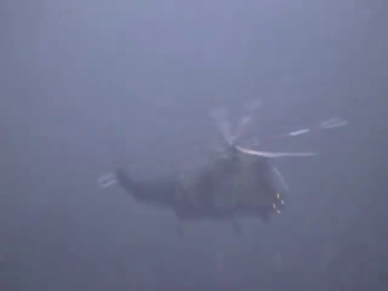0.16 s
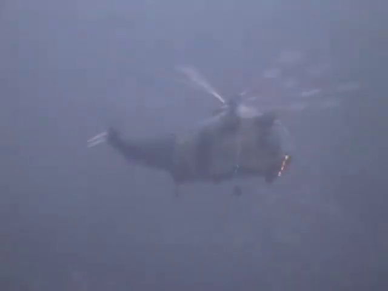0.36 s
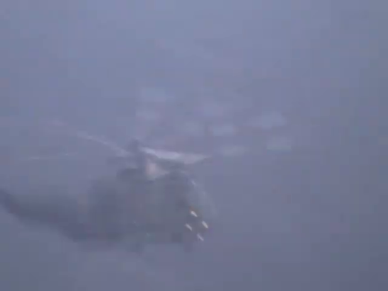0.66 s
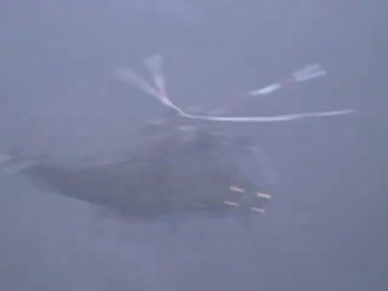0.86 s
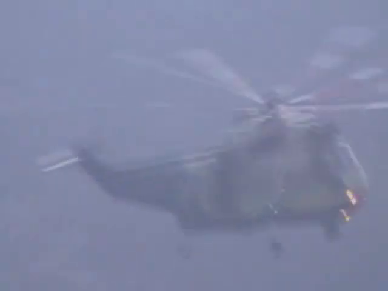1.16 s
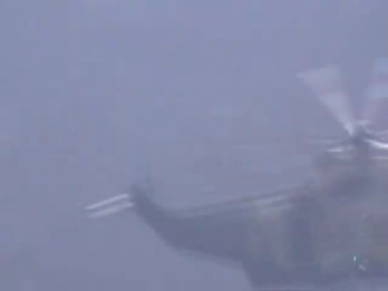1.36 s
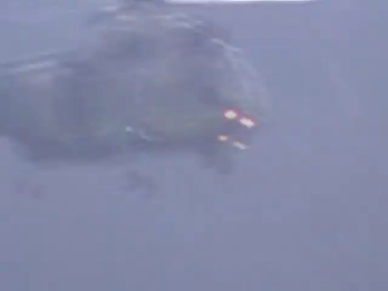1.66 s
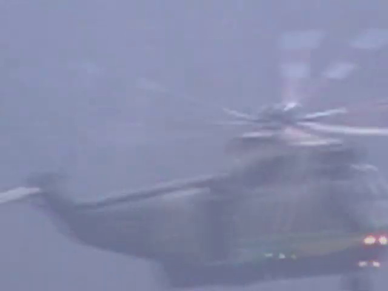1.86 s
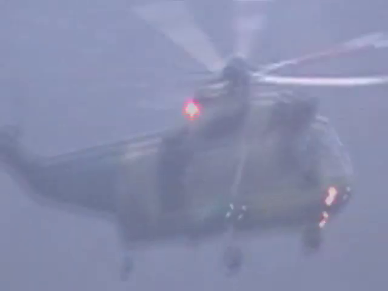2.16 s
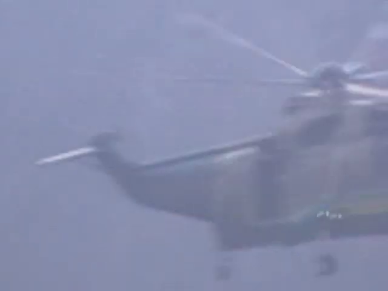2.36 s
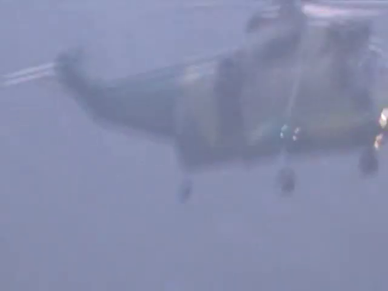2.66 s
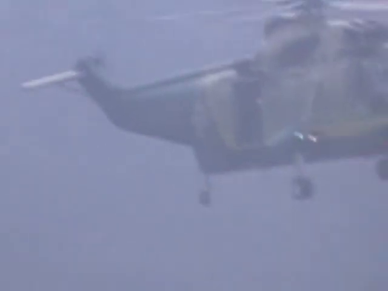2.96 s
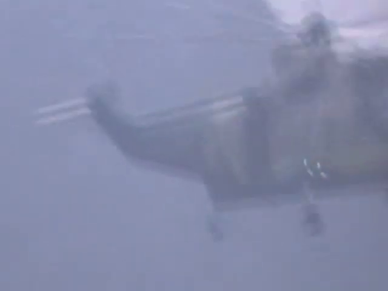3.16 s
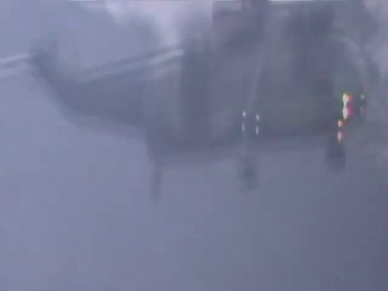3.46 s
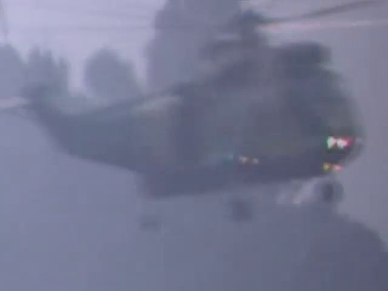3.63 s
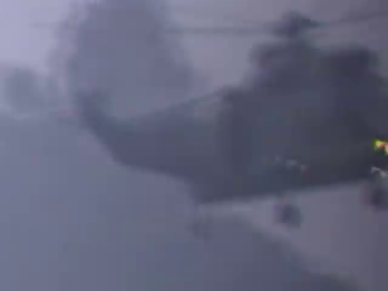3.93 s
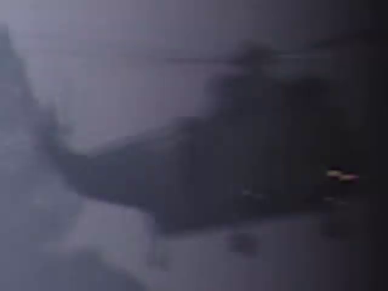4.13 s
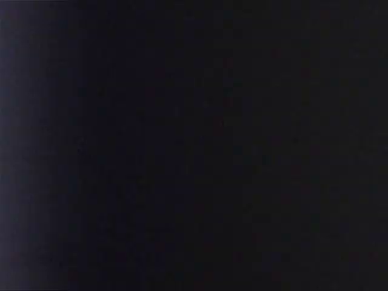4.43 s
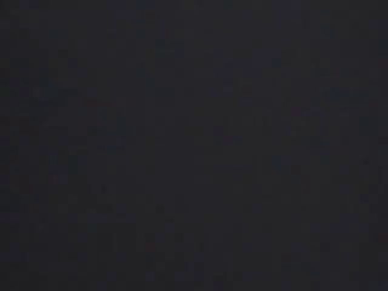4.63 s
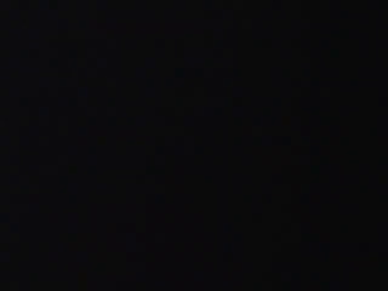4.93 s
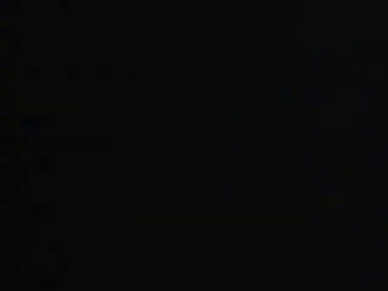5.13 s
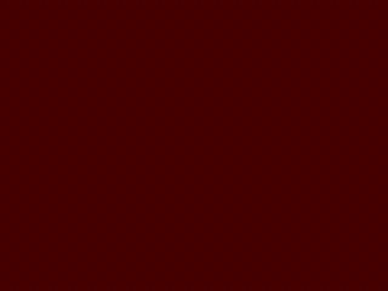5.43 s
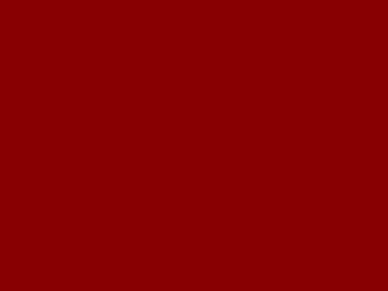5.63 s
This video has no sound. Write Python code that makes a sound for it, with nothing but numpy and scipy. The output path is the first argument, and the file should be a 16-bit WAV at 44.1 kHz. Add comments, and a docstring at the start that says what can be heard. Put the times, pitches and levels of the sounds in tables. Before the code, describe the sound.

Rapid, uneven helicopter chopping and low thumping with a breathy turbine hiss and thin whine, one dry microphone click, then a smooth fade-out.

```python
"""Rotor beats thump against each other as a helicopter passes slowly outdoors, over turbine hiss and roar.
Three sums of harmonics make the beats; the chopping one also swells the treble of the shaped-noise hiss.
Blade slaps are short decaying rings, the roar is noise in swelling bands, whine and buzz follow the thump.
Short noise bursts click once at the microphone housing, and the sound fades to silence."""
import sys
import numpy as np
from scipy import signal
from scipy.fft import rfft, irfft
from scipy.io import wavfile
from scipy.ndimage import uniform_filter1d

SR = 44100
rng = np.random.default_rng(int(sys.argv[2]) if len(sys.argv) > 2 else 0)


def unload_audio(sound):
    """Save the sound as a 16-bit wav file, at the path given as the first command line argument."""
    columns = np.transpose(np.atleast_2d(sound))
    # keep every value between -1 and 1, then stretch to whole-number steps
    steps = np.round(np.clip(columns, -1, 1) * 32767)
    wavfile.write(sys.argv[1], SR, steps.astype(np.int16))


N = 255339
T = np.arange(N) / SR  # time, s

# Beat rates, the thump sinking as the machine draws past: time_s, thump_hz, throb_hz
BEAT_RATES = [(0, 38.717, 22.126), (.6, 38.683, 22.568), (1.2, 38.575, 22.374), (1.8, 38.394, 22.033),
              (5.4, 37.727, 22.027)]
CHOP_PER_THUMP = .95585  # the chop is geared to the thump
FADE_FROM_S, FADE_TO_S = 3.486, 5.332


def gain_of(db):
    """dB to gain."""
    return 10 ** (np.asarray(db) / 20)


def evened(x):
    """Scales to rms 1."""
    return x / np.sqrt(np.mean(x ** 2) + 1e-20)


def read(points, hz, count=1):
    """One column of a spectrum table, on a log-frequency axis."""
    columns = np.transpose(points)
    return np.interp(np.log(hz + 1), np.log(columns[0] + 1), columns[count])


def curve(rows, count):
    """One column of a time table at every sample."""
    columns = np.transpose(rows)
    return np.interp(T, columns[0], columns[count])


def drift(per_s):
    """Slow random wander of rms 1, with so many new values per second."""
    steps = rng.standard_normal(600)
    return evened(np.interp(T * per_s, np.arange(600), steps))


def turns(count):
    """Cycles since the first pulse of one beat: 0 thump, 1 throb, 2 chop."""
    # Time of the first pulse of thump, throb and chop: start_s
    first_pulse_s = (.01911, .01085, -.00014)
    thump_hz = curve(BEAT_RATES, 1)
    hz = (thump_hz, curve(BEAT_RATES, 2), CHOP_PER_THUMP * thump_hz)[count]
    return np.cumsum(hz) / SR - hz[0] * first_pulse_s[count]


def beat(orders, count, gain_db, waver_db):
    """One pressure pulse a cycle: its multiples start together and ring on, the higher ones shifted in phase."""
    # Growing lag of each multiple behind the one below, for thump, throb and chop: lag_cycles
    sweep = (.009, -.002, .042)
    k, db = np.transpose(orders)
    filled_db = np.interp(np.arange(33), np.r_[0, k, 32], np.r_[db[0], db, -80])
    log_gain = np.log(gain_of(filled_db))
    # The least-delay phase that belongs to these levels
    phase = -np.imag(signal.hilbert(np.r_[log_gain, log_gain[-2:0:-1]]))
    start = phase[k.astype(int)] - np.pi * sweep[count] * k ** 2
    cycles = turns(count)
    pulse = np.zeros(N)
    for multiple, level_db, offset in zip(k, db, start):
        level = np.sqrt(2) * gain_of(level_db + gain_db + waver_db * drift(8))
        pulse += level * np.cos(2 * np.pi * multiple * cycles + offset)
    return pulse


def rotor_beats():
    """Three rotor pulse trains at different rates drift in and out of step."""
    # Strength of each multiple of a beat, before its gain trim: multiple, level_db (rms)
    thump = [(1, -47.0), (2, -63.0), (3, -39.0), (4, -45.0), (5, -53.0), (6, -47.0), (7, -41.0), (8, -36.0),
             (9, -33.0), (10, -36.0), (11, -38.0), (12, -39.0), (13, -39.0), (14, -55.0), (15, -64.0),
             (16, -61.0), (17, -59.0), (18, -81.0)]
    throb = [(1, -70.0), (2, -53.0), (3, -42.0), (4, -38.0), (5, -43.0), (6, -40.0), (7, -39.0), (8, -57.0),
             (9, -49.0), (10, -48.0), (11, -45.0), (12, -50.0)]
    chop = [(1, -62.0), (2, -68.0), (3, -53.0), (4, -44.0), (5, -47.0), (6, -44.0), (7, -52.0), (8, -48.0),
            (9, -40.0), (10, -43.0), (11, -44.0), (12, -47.0), (13, -48.0), (14, -50.0), (15, -67.0)]
    beats = beat(thump, count=0, gain_db=0.0, waver_db=0.88)
    beats += beat(throb, count=1, gain_db=0.96, waver_db=2.0)
    return beats + beat(chop, count=2, gain_db=-0.05, waver_db=1.15)


def slaps(rise_s, t60, count, gain_db):
    """A blade cuts a vortex: a sharp crack, wider for the loud ones, then a short ring; faint ones at random."""
    # The loud slaps: start_s, level_db (before rise and trim), ring_hz
    loud = [(0.5851, -25, 1180), (0.6165, -24, 1120), (0.6699, -17, 1270), (0.7287, -21, 1180),
            (0.7831, -25, 1170), (0.8395, -20, 1310), (0.8944, -21, 1210), (0.9482, -22, 1200),
            (1.0191, -21, 1170), (1.1368, -22, 1240), (1.281, -23, 1180), (1.3394, -21, 1150),
            (1.3887, -23, 1160), (1.4486, -19, 1240), (1.5628, -25, 1200), (1.8901, -23, 1210),
            (2.2294, -28, 1110), (2.3296, -27, 1310), (2.4987, -26, 1140), (3.1428, -27, 1190),
            (3.235, -24, 1140), (3.5912, -28, 1320), (3.6471, -27, 1290), (3.696, -23, 1280),
            (3.7454, -25, 1260), (3.8067, -24, 1180), (3.9684, -26, 1150), (4.0243, -28, 1200),
            (4.4603, -36, 1180), (1.8821, -29, 1730), (2.0043, -29, 1610), (2.0602, -28, 1700),
            (2.164, -32, 1560)]
    faint_hz, faint_db = 1260, -29.5
    out, t = np.zeros(N), np.arange(2000) / SR
    rows = list(loud) + [(s, faint_db, faint_hz) for s in rng.uniform(0, FADE_TO_S, count)]
    for (s, db, hz), (p, q) in zip(rows, rng.random((len(rows), 2))):
        # One partner above the ring and one below widen the first instant
        partners = np.sin(2 * np.pi * (1.3 + .15 * p) * hz * t)
        partners += np.sin(2 * np.pi * (.55 + .2 * q) * hz * t)
        ring = np.sin(2 * np.pi * hz * t) + gain_of(db + 17 - 2500 * t) * partners
        envelope = gain_of(db + gain_db - 60 * t / t60) * (1 - np.exp(-t / rise_s))
        out[round(s * SR):][:2000] -= envelope * ring
    return out


def puffs(cycles, at, width):
    """A bell-shaped opening once a cycle; place and width in cycles."""
    return np.exp(-.5 * (((cycles - at + .5) % 1 - .5) / width) ** 2)


def chop_strength(cycles, spread_db):
    """Each pass of the chopping beat has its own strength; some drop out."""
    # Passes at which the chop falls weak: time_s, drop_db
    dropouts = [(0.45, -25), (0.774, -25), (0.883, -25), (0.937, -25), (0.991, -9), (1.045, -25),
                (1.127, -8), (1.235, -25), (1.289, -7), (1.425, -25), (1.588, -25), (1.615, -7),
                (1.643, -10), (1.697, -25), (1.752, -6), (1.806, -25), (1.997, -25), (2.051, -25),
                (2.27, -7), (2.434, -25), (2.625, -25), (2.762, -25), (2.817, -25), (2.899, -25),
                (2.981, -25), (3.283, -9), (3.31, -25), (3.365, -8), (3.42, -8), (3.503, -10), (3.53, -9),
                (3.557, -25), (3.722, -25), (3.805, -9), (3.915, -25), (4.025, -7), (4.135, -25),
                (4.218, -9), (4.301, -25), (4.356, -25), (4.384, -25), (4.466, -25), (4.632, -9),
                (4.66, -25), (4.964, -25)]
    db = spread_db * (1 + rng.random(300)) / 2
    s, drop_db = np.transpose(dropouts)
    db[np.floor(np.interp(s, T, cycles)).astype(int) + 1] += drop_db
    return gain_of(db)[np.floor(cycles).astype(int) + 1]


def air(db_per_hz, patchy_db, chop=None):
    """Noise as random short-time spectra with drifting patches; two unrelated draws."""
    # Swell of the treble for a chop value of 1: frequency_hz, swell_db
    chopped = [(1500, 0), (3500, 2.5), (6500, 4), (9000, 4), (12000, 5)]
    frames, hz = N // 64 + 8, np.fft.rfftfreq(256, 1 / SR)
    a, b, c, d, patches = rng.standard_normal((frames, 129, 5)).T
    # Smoothed over 3 frequency bins and 30 frames
    patches = uniform_filter1d(uniform_filter1d(patches, 3, 0), 30, 1)
    field_db = patchy_db * evened(patches)
    if chop is not None:
        chop_at_frames = np.interp(np.arange(frames) * 64, np.arange(N), chop)
        field_db = field_db + read(chopped, hz)[:, None] * chop_at_frames
    plain = np.array([a + 1j * b, c + 1j * d])
    white = signal.istft(plain * gain_of(field_db), nperseg=256, noverlap=192)[1][:, :N]
    white = white / np.std(signal.istft(plain, nperseg=256, noverlap=192)[1])
    colour = gain_of(db_per_hz(np.fft.rfftfreq(N, 1 / SR))) * np.sqrt(SR / 2)
    return irfft(rfft(white) * colour, N)


def band(hz, width, x):
    """A bell-shaped band of x."""
    f = np.fft.rfftfreq(x.shape[-1], 1 / SR)
    return irfft(rfft(x) * np.exp(-.5 * ((f - hz) / width * 2) ** 2), x.shape[-1])


def repeating(gains, cycles, change_per_s):
    """A wave that returns every cycle, from the gains of its multiples; its shape slowly changes."""
    angle = rng.uniform(0, 2 * np.pi, (2, len(gains)))
    a, b = irfft(gains * np.exp(1j * angle), 8192) * 8192 / np.sqrt(2)
    place = cycles % 1 * 8192
    blend = change_per_s * T  # radians
    first = np.cos(blend) * np.interp(place, np.arange(8192), a)
    return first + np.sin(blend) * np.interp(place, np.arange(8192), b)


def compressor_tones(cycles):
    """Wavering high tones of the compressor, let through at each chop."""
    # Tones: multiple_of_chop, place_cycles, width_cycles, level_db (peak, before the strength of the pass)
    chirp = [(270, .635, .04, -50.5), (258, .77, .025, -54), (247, .72, .06, -56)]
    high = np.zeros(N)
    for k, at, width, db in chirp:
        level = gain_of(db + 1.2 * drift(29)) * puffs(cycles, at, width)
        high += level * np.sin(2 * np.pi * (k * cycles + .12 * drift(30)))
    return high


def hiss_bands():
    """Narrow bands of noise in the hiss, each with a wavering level."""
    # Bands: centre_hz, width_hz, level_db (rms, before wavering)
    tones = [(3066, 40, -60), (3425, 60, -63), (3568, 30, -64), (3714, 60, -62), (3895, 60, -63),
             (4136, 35, -63), (4300, 20, -68), (4898, 55, -62.5), (5760, 173, -63), (6340, 80, -66),
             (6780, 100, -66)]
    return sum(gain_of(db + 2 * drift(4)) * evened(band(hz, width, rng.standard_normal((2, N))))
               for hz, width, db in tones)


def turbines(cycles):
    """Wide hiss that swells at each chop, partly alike from pass to pass, with high tones and narrow bands."""
    # Colour of the turbine hiss: frequency_hz, relative_level_db (per Hz)
    hiss_colour = [(400, -22), (560, 1.5), (750, -10), (880, -3.5), (1000, -0.5), (1290, 1), (1450, -4),
                   (1700, -2.5), (2300, -8.5), (3000, -14), (4500, -18), (6800, -18.5), (8200, -22.5),
                   (10150, -23.5), (10400, -27.5), (11500, -39), (14600, -46)]
    hiss_db = -39  # rms
    repeat_db, repeat_from_hz = -59, 3500  # the part alike from pass to pass, before swell and strength
    strength = chop_strength(cycles - .2, spread_db=6)
    swell = puffs(cycles, at=.62, width=.05) / 2 + puffs(cycles, at=.72, width=.12)
    chop = swell * (0.6 * strength - 0.2)
    hiss = evened(air(lambda hz: read(hiss_colour, hz), patchy_db=1.0, chop=chop))
    high = compressor_tones(cycles)
    hz = np.arange(320) * CHOP_PER_THUMP * BEAT_RATES[0][1]
    gains = gain_of(read(hiss_colour, hz)) * (hz > repeat_from_hz)
    same = evened(repeating(gains, cycles, change_per_s=1.5) * (.3 + swell))
    return gain_of(hiss_db) * hiss + hiss_bands(), strength * (high + gain_of(repeat_db) * same)


def swelling(hz):
    """Gain of one band of roar: calm, plus every swell that reaches it."""
    # Swells of the roar: peak_s, half_length_s, centre_hz, peak_db (before flutter)
    swells = [(0.32, 0.23, 1225, -47.5), (0.4, 0.42, 620, -39), (1.03, 0.49, 1170, -36.5),
              (.7, .06, 800, -46), (1.06, 0.074, 650, -38.5), (1.1, 0.1, 2220, -50.5),
              (1.56, 0.25, 1650, -43.5), (1.506, 0.056, 2400, -50), (2.22, 0.31, 1250, -46.5),
              (1.89, 0.09, 880, -45.5), (1.86, .15, 1660, -50.5), (3.33, .2, 640, -42),
              (3.17, 0.2, 1180, -43.5), (3.86, 0.18, 1190, -42.5), (4.248, 0.074, 1670, -51)]
    calm_db, calm_fall_db_per_khz = -51.5, 3.5
    flank_db, reach_db_per_octave = 5.5, 26.5  # fall at one half-length from the peak; fall off the centre
    gain = gain_of(calm_db - calm_fall_db_per_khz * hz / 1000)
    for s, half, centre_hz, db in swells:
        fall_db = flank_db * ((T - s) / half) ** 2
        distance_db = reach_db_per_octave * abs(np.log2(hz / centre_hz))
        gain = gain + gain_of(db - fall_db - distance_db)
    return gain


def roar():
    """Rumble, and broad bands that swell slowly, flutter, and jump as each main blade passes, then sink back."""
    # Low rumble: frequency_hz, level_db (per Hz)
    rumble = [(18, -105), (32, -64), (60, -75.5), (110, -57.5), (180, -55), (280, -67), (420, -63.5),
              (600, -65), (900, -77), (3000, -160)]
    # Broad bands of blade roar: centre_hz, width_hz
    roar_bands = [(640, 280), (880, 170), (1220, 270), (1700, 220), (2200, 240), (2750, 730)]
    blade_hz, blade_at_s = 18.17, .670  # main blades passing; one passes at this time
    passes = (T - blade_at_s) * blade_hz
    jump = uniform_filter1d(np.exp(-(passes % 1) / .3) - .3, 40)
    bands = np.zeros((2, N))
    for hz, width in roar_bands:
        jump_size = rng.random(200)[np.floor(passes + 20).astype(int)]  # one for each pass
        flutter = gain_of(2.13 * drift(60) + 7.1 * jump * jump_size)
        bands += swelling(hz) * flutter * evened(band(hz, width, rng.standard_normal((2, N))))
    return air(lambda hz: read(rumble, hz), patchy_db=0.8) + bands


def whine():
    """Thin gear tones at multiples of the thump die away slowly."""
    # Tones: multiple_of_thump, start_level_db (rms, before wavering), fall_db_per_s_squared
    gears = [(22, -53, .8), (23, -52, .1), (23.98, -46.5, 1.3)]
    cycles, out = turns(count=0), np.zeros(N)
    for k, db, fall in gears:
        level = np.sqrt(2) * gain_of(db - fall * T ** 2 + 2.2 * drift(6))
        out += level * np.sin(2 * np.pi * (k * cycles + .02 * drift(10)))
    return out


def buzz():
    """Thin steady lines in the upper middle, locked to the thump."""
    # Groups of high multiples: middle_multiple, multiples_to_each_side (3 dB down), level_db (rms at middle)
    groups = [(40, 1, -57), (44, .5, -60), (50.7, .5, -62), (54, .5, -60), (56.5, .5, -62)]
    k = np.arange(130)
    gains = sum(gain_of(db - 3 * ((k - mid) / side) ** 2) for mid, side, db in groups)
    return repeating(gains, turns(count=0), change_per_s=.4)


def clicks(alike):
    """Something small clicks against the housing: dry bursts that differ between the ports."""
    # Bursts: start_s, left_level_db, right_level_db, t60_s
    bursts = [(1.6668, -33, -26, .012), (1.6705, -14, -14, .009), (1.6716, -18, -28, .014),
              (1.6726, -26, -20, .018)]
    # Colour of the click: frequency_hz, relative_level_db (per Hz)
    colour = [(400, -14), (900, -2), (1700, 3), (2600, 0), (3400, -9), (4300, -10), (5700, -5), (7200, -15),
              (8500, -21), (9700, -14), (12000, -28), (14600, -42)]
    out, t = np.zeros((2, N)), np.arange(1000) / SR
    colour_gain = gain_of(read(colour, np.fft.rfftfreq(1000, 1 / SR)))
    draws = rng.standard_normal((len(bursts), 3, 1000))
    for (s, left_db, right_db, t60), (shared, *own) in zip(bursts, draws):
        noise = alike * shared + np.sqrt(1 - alike ** 2) * np.array(own)
        shape = gain_of(-60 * t / t60) * (1 - np.exp(-t / .0001))
        crack = shape * irfft(rfft(noise) * colour_gain)
        # Each burst gets the energy of its envelope
        crack = crack * np.linalg.norm(shape) / np.linalg.norm(crack, axis=1, keepdims=True)
        out[:, round(s * SR):][:, :1000] += gain_of(np.c_[[left_db, right_db]]) * crack
    return out


def ports(common, other):
    """Both ports hear one sound at another level and phase; the right also hears what the left does not."""
    # The two microphone ports: frequency_hz, left_minus_right_db, left_lead_radians, likeness (0 to 1)
    port_pair = [(25, 9, -1.2, .9), (45, 5, -1, .95), (90, 1, -.8, .95), (150, -1.5, -.55, .95),
                 (300, -3.5, -.2, .96), (600, -3.2, -.05, .96), (1250, -1.8, 0, .93), (2300, -1.5, 0, .92),
                 (4200, -4, 0, .88), (6500, -1.5, .15, .75), (8300, 2, -1.7, .6), (10000, .8, -1.2, .7),
                 (12000, -.5, -.5, .5), (14600, 0, -.3, .4)]
    hz = np.fft.rfftfreq(N, 1 / SR)
    tilt = gain_of(read(port_pair, hz, count=1) / 2) * np.exp(.5j * read(port_pair, hz, count=2))
    same = np.clip(read(port_pair, hz, count=3), 0, 1)
    left = rfft(common) * tilt
    right = (same * rfft(common) + np.sqrt(1 - same ** 2) * rfft(other)) / tilt
    return irfft(np.array([left, right]), N)


def scene():
    """All sources reach both ports, the right with some noise of its own; clicks come through the housing."""
    beats = rotor_beats()
    hiss, chopped_treble = turbines(turns(count=2))
    noise = hiss + roar()
    slapping = slaps(rise_s=.0003, t60=.035, count=8, gain_db=-1)
    common = beats + chopped_treble + whine() + buzz() + slapping + noise[0]
    return ports(common, noise[1]) + clicks(alike=.7)


def record(dry):
    """A straight fade to silence, then the band limit."""
    edge_hz = 14600
    fade = np.clip((FADE_TO_S - T) / (FADE_TO_S - FADE_FROM_S), 0, 1)
    lowpass = signal.firwin(511, edge_hz, window=("kaiser", 9), fs=SR)
    return signal.oaconvolve(dry * fade, lowpass[None], "same")


dry = scene()
out = record(dry)
unload_audio(out)
```